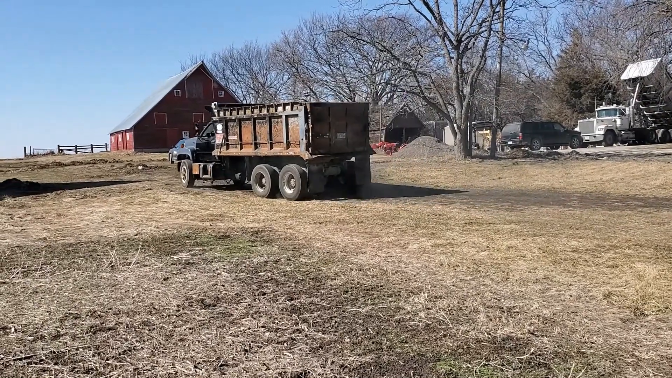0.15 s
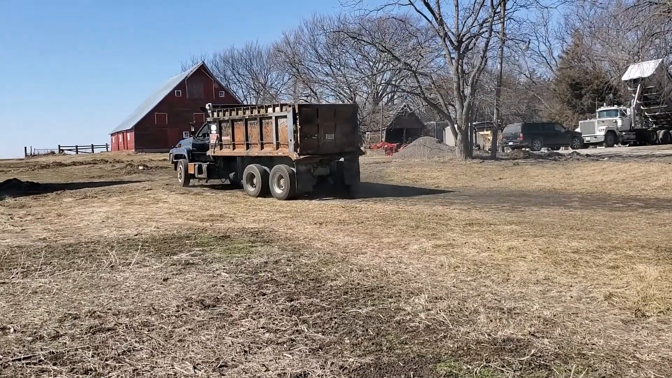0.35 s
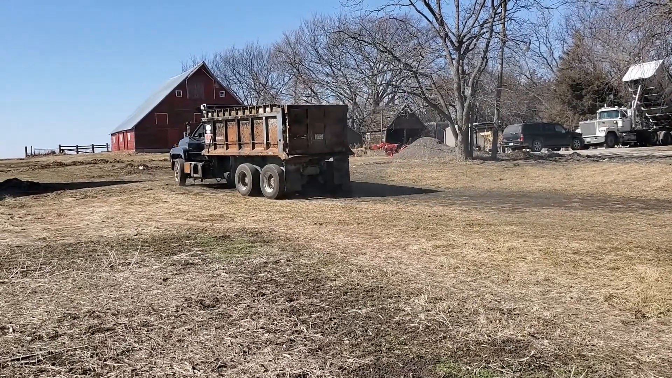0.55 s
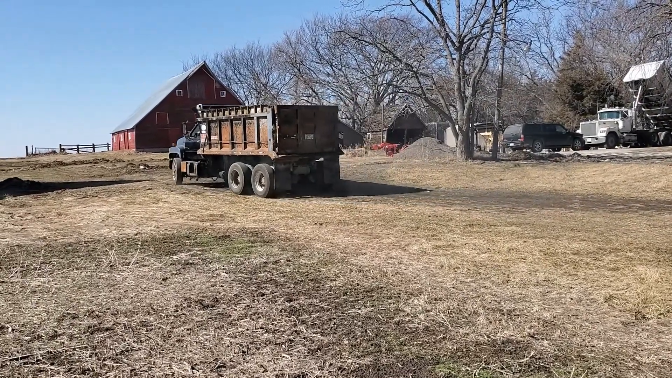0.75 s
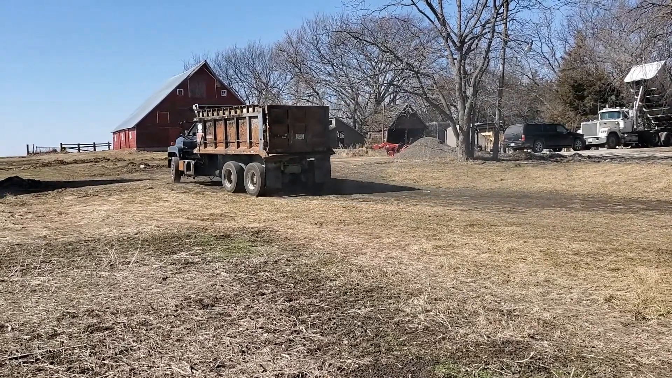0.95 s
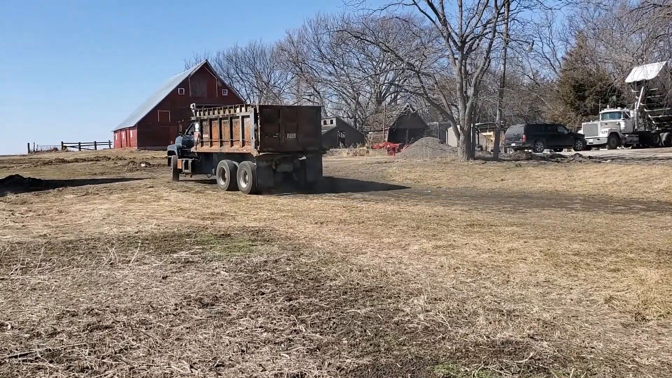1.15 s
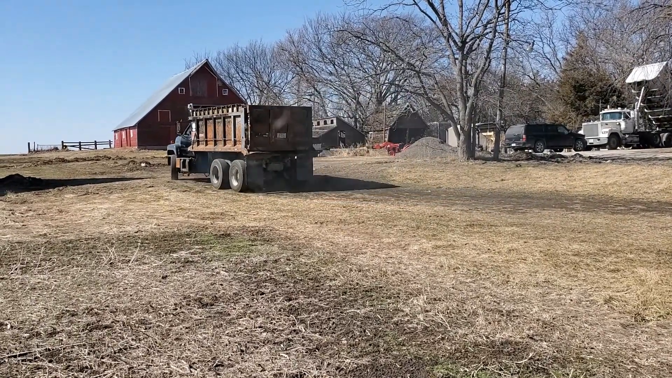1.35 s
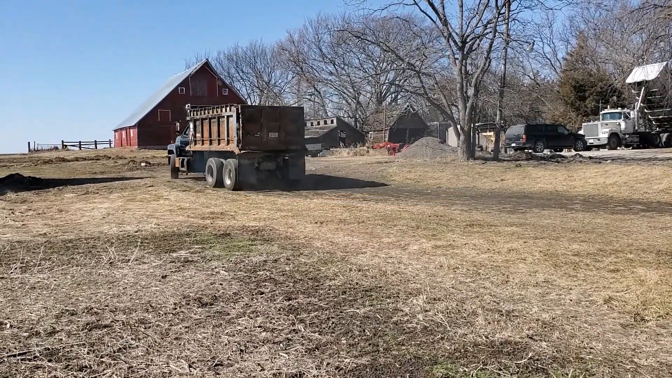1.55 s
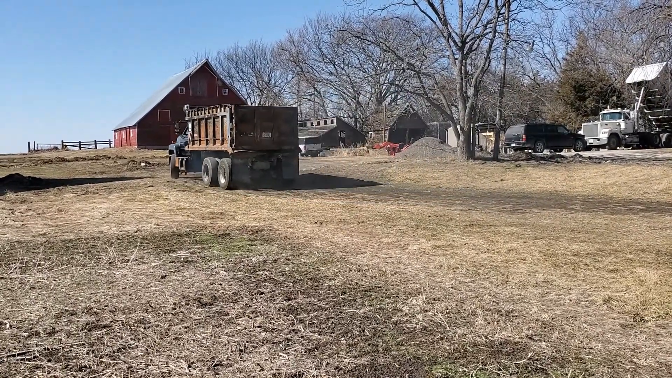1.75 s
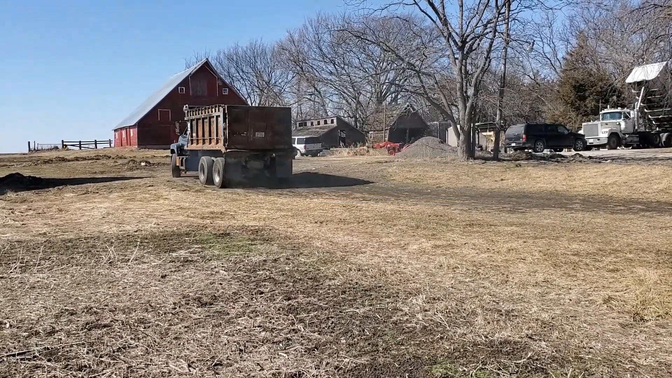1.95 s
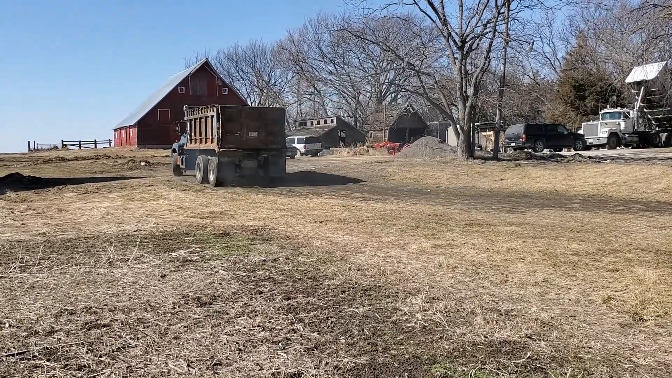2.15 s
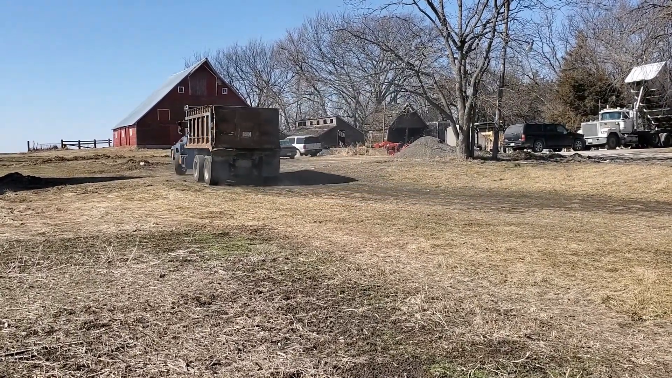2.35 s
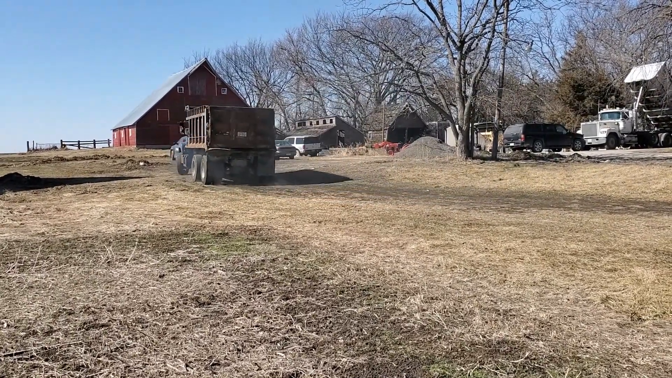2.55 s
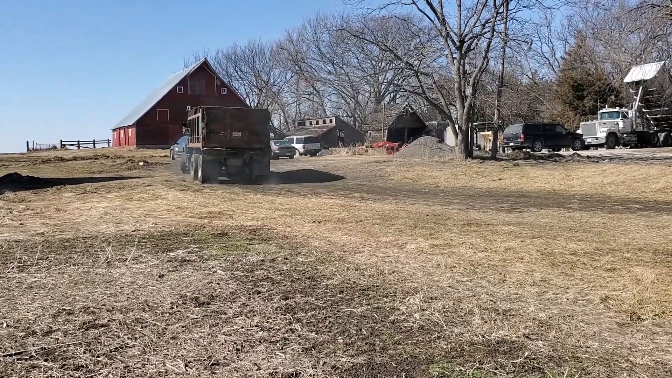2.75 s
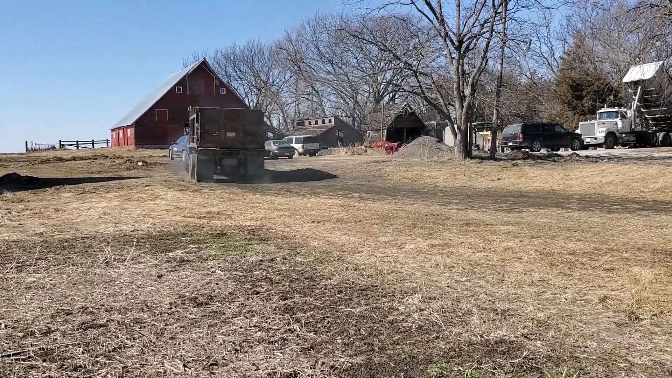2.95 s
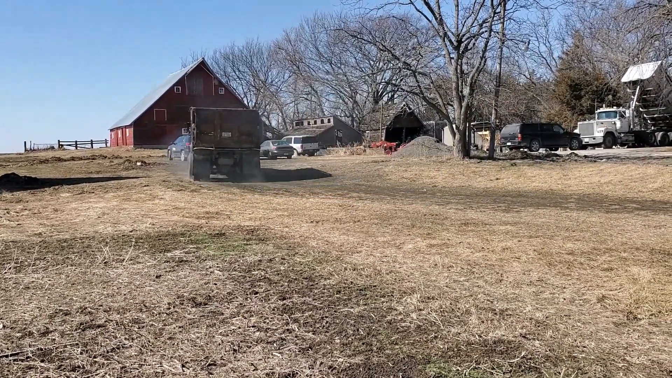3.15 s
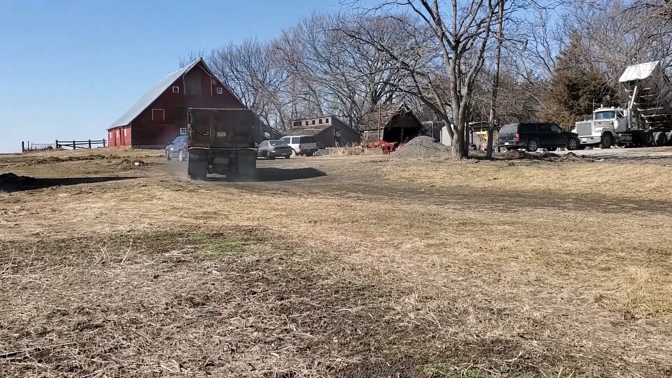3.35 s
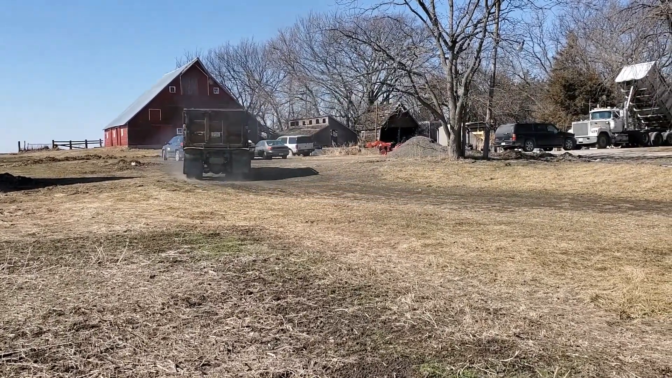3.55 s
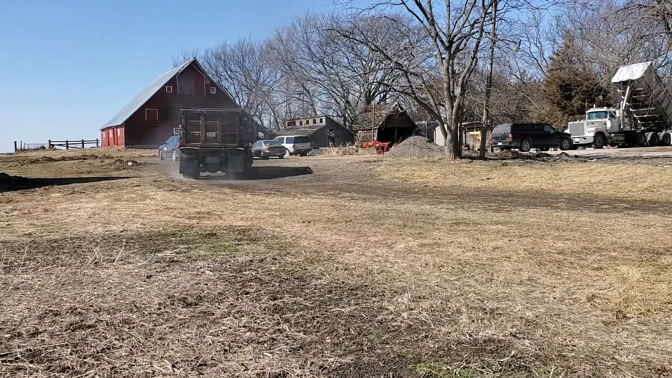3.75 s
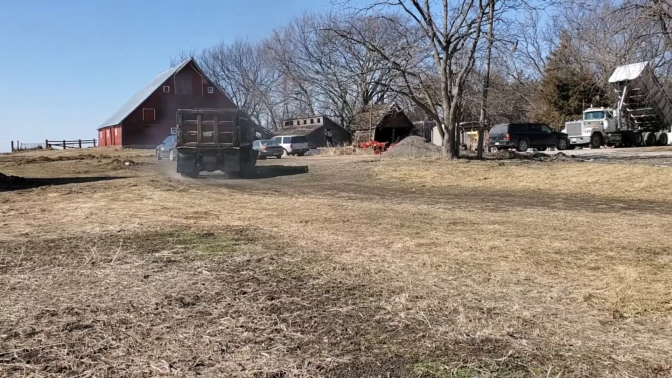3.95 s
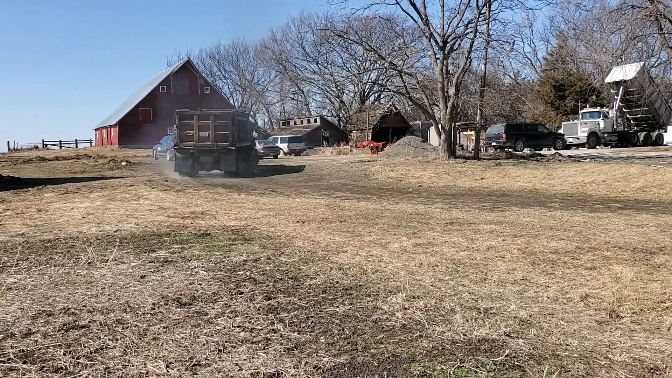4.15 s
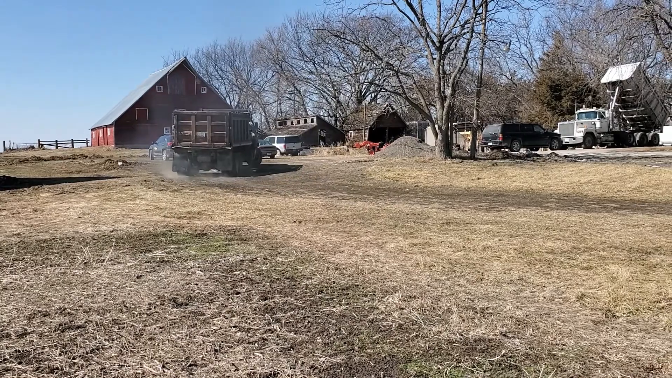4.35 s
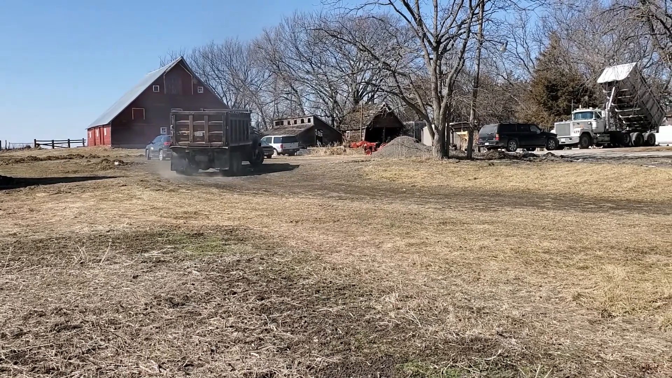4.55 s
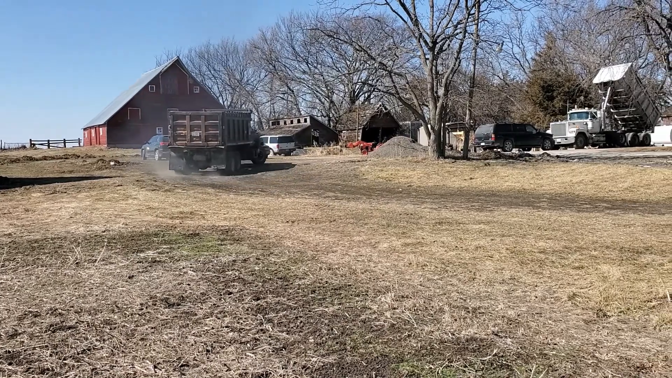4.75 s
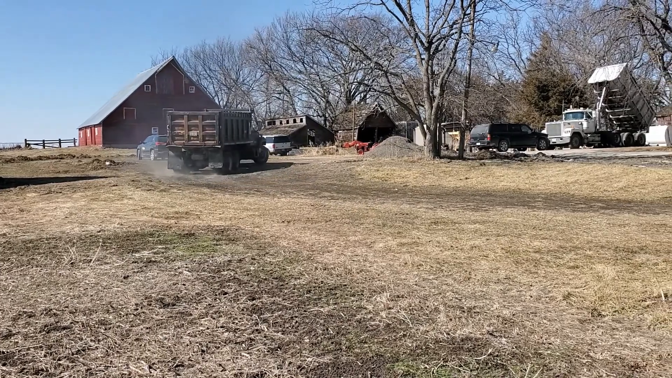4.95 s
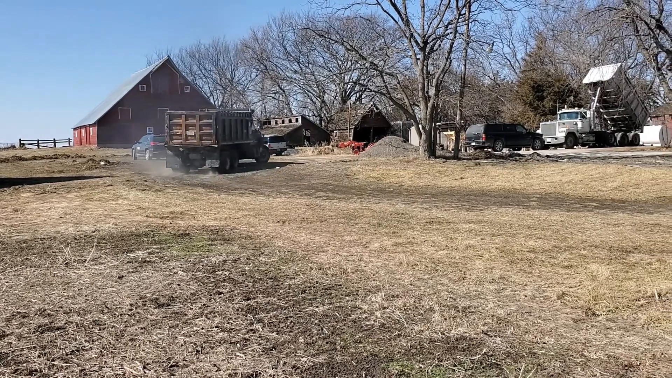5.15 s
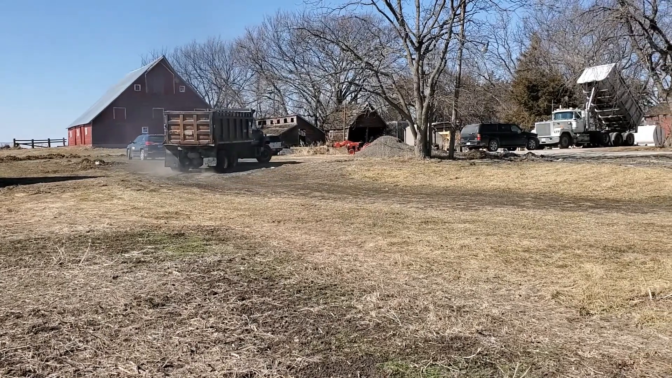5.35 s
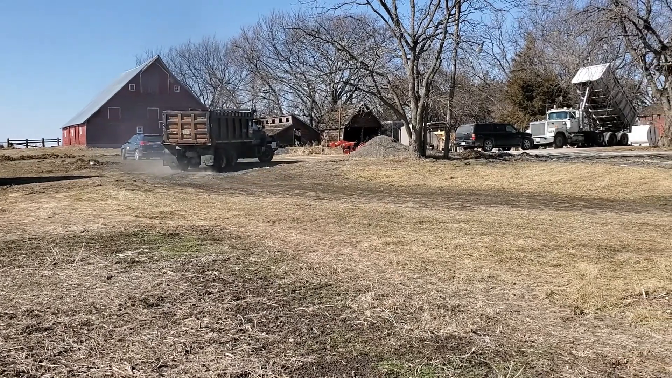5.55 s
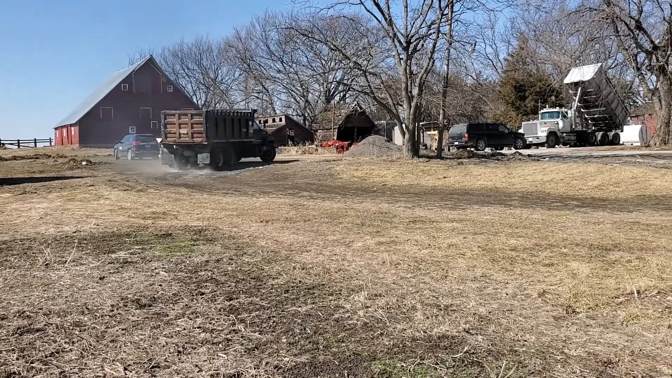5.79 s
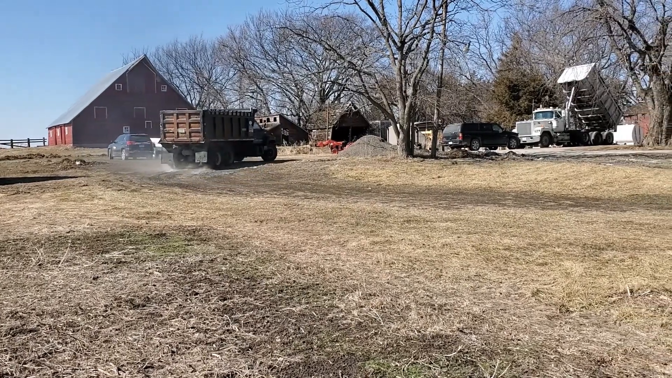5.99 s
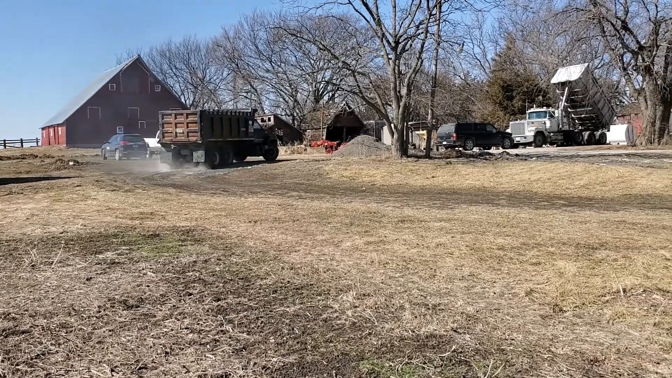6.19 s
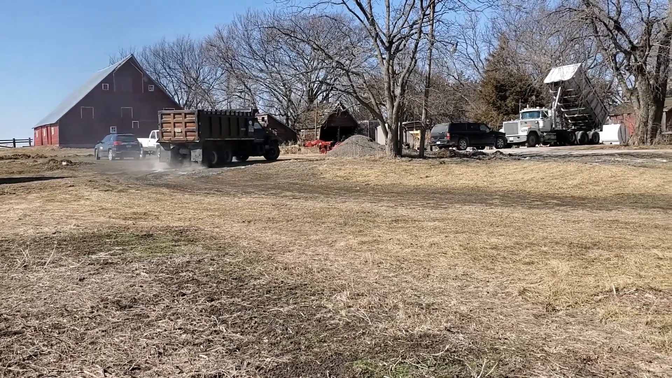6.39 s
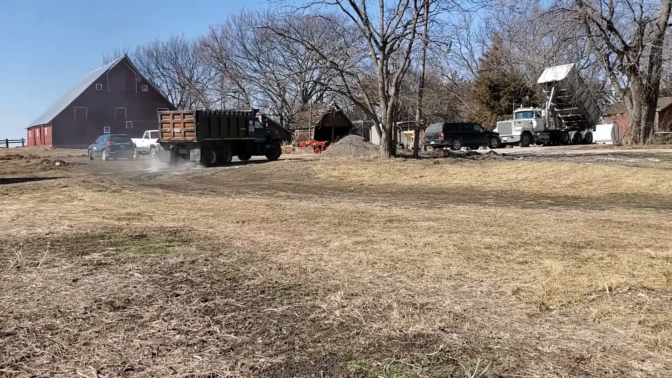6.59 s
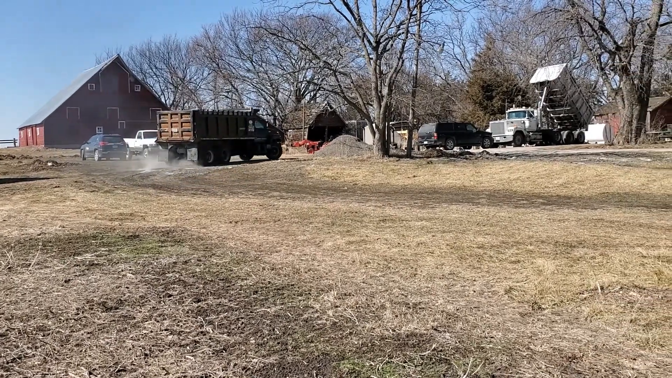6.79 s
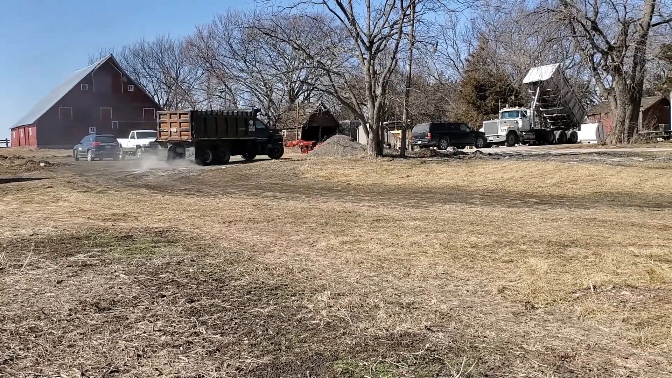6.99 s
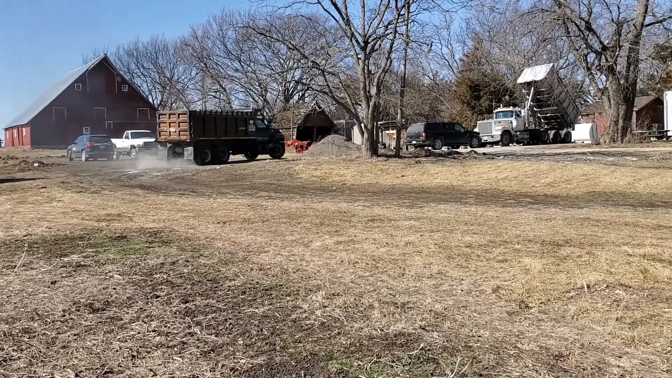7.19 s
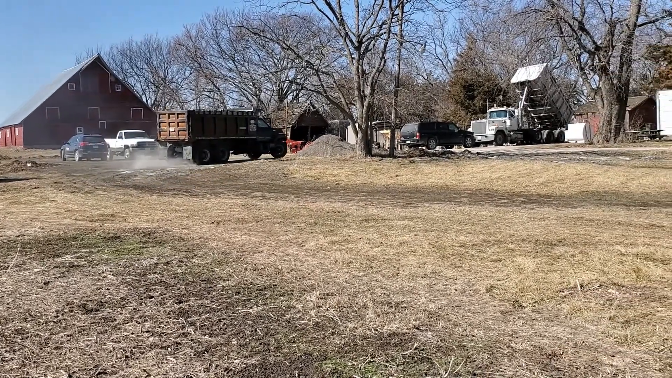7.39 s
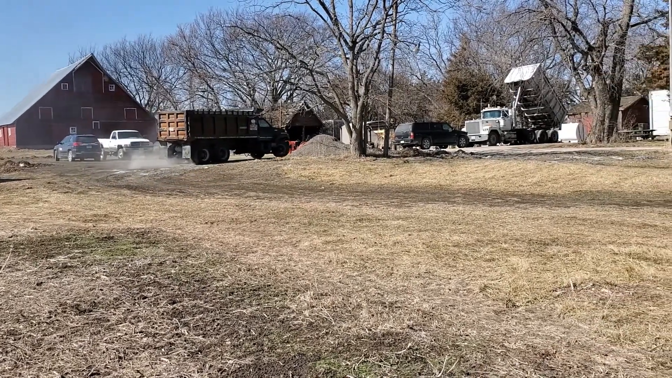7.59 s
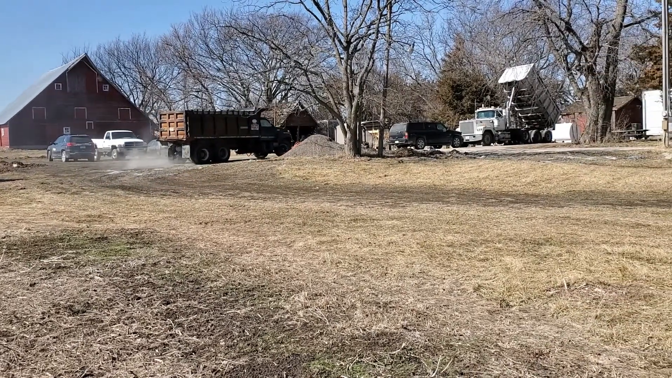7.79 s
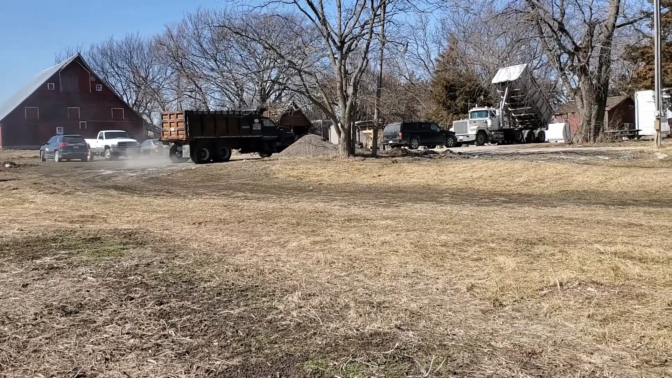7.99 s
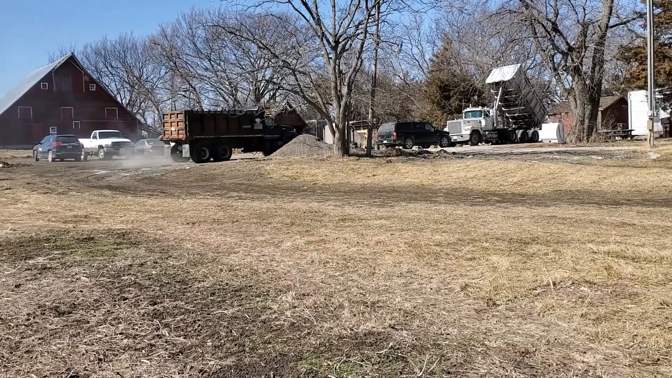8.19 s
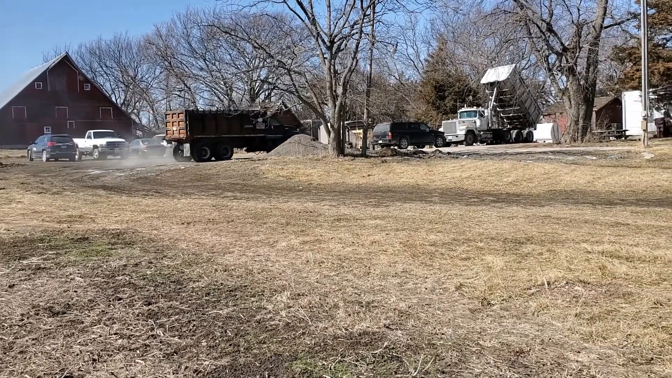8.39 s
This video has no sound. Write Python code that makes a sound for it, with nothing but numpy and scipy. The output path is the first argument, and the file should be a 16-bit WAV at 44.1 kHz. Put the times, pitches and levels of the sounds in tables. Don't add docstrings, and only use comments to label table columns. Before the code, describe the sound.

Steady deep diesel drone with knocking, hissing clatter, dulling as the truck turns away outdoors, then breaking up under low, fluttering wind gusts.

```python
import sys
import numpy as np
from scipy import signal
from scipy.fft import rfft, irfft, next_fast_len
from scipy.io import wavfile
from scipy.ndimage import uniform_filter1d

SR = 44100
rng = np.random.default_rng(int(sys.argv[2]) if len(sys.argv) > 2 else 0)


def unload_wav(signal):
    wavfile.write(
        sys.argv[1],
        SR,
        np.round(np.clip(np.atleast_2d(signal).T, -1, 1) * 32767).astype(np.int16),
    )


def rack_gain(trim_db):
    fader = np.asarray(trim_db, float)
    return 10 ** (fader / 20)


N = 371763

# t/s, f/Hz
FIRING_RATE_HZ = [(0, 79.7), (.5, 79.4), (1.35, 79.15), (1.7, 78.7), (2.1, 79.1), (2.6, 78.25), (2.9, 78.6),
                  (3.25, 78.0), (3.85, 78.9), (4.12, 78.35), (4.42, 79.4), (5.3, 78.05), (5.7, 78.25),
                  (6.45, 79.6), (6.78, 79.4), (7.05, 77.1), (7.62, 76.1), (8.43, 76.5)]
# t/s, level/dB
HUM_DB = [(0, -19), (.2, -15.5), (.95, -16), (1.35, -18), (1.65, -21.3), (2.0, -22), (2.5, -16.5),
          (2.75, -18), (3.25, -19), (3.65, -18.5), (4.3, -18.5), (4.5, -17), (4.85, -21), (5.25, -20.5),
          (6.0, -18.5), (6.9, -20), (7.35, -25), (8.43, -25)]
# t/s, half length/s, level/dB
DROPOUTS_DB = [(4.83, .04, -3), (6.3, .02, -6), (6.732, .014, -14), (7.055, .015, -6), (7.30, .035, -7),
               (7.68, .018, -9), (7.99, .015, -7), (8.165, .02, -7), (8.275, .03, -16), (8.34, .02, -12),
               (8.38, .012, -8), (8.405, .012, 5)]
# order of the four-stroke cycle, level re hum/dB
UNEVEN_ORDERS_DB = [(2, -45), (3, -37.5), (4, -21), (5, -24.5), (7, -49.5), (8, -27.5), (9, -32.5),
                    (10, -40), (14, -40), (16, -34.5), (18, -33.5)]
# f/Hz, level per Hz/dB
RUMBLE_SPECTRUM_DB = [(20, -31.5), (45, -3.5), (65, 8), (100, 8.5), (160, 6), (240, -8), (330, -35),
                      (500, -55)]
CYLINDER_KNOCK_DB = [3.5, -4.5, -1, -4.5, 0.5, 1]
# order of the cycle, start t/s, end t/s, level re knock/dB
GEAR_ORDERS_DB = [(39, -1.5, 3.1, 8), (39, 4.4, 7.3, 8), (45, -.8, 1.3, 7), (48, .2, 1.3, 4),
                  (48, 4.4, 6.6, 10), (42, 1., 2.9, 6), (42, 3.8, 5.2, 7), (51, 1.5, 3.6, 5),
                  (51, 4.9, 5.9, 7), (70, -.5, 1., 8), (70, 1.3, 2.9, 16), (70, 5., 6.4, 9),
                  (105, -.5, 2.2, 8), (100, 1.3, 2.4, 8), (76, 5., 6., 11), (81, .5, 2.3, 9),
                  (84, .2, 2., 9), (87, 7.38, 8.4, 13), (87, 7.9, 8.25, 9), (93, 4.9, 6.5, 9),
                  (100, .8, 1.6, 9), (109, .4, 1.7, 7), (124, -.5, 2.2, 8), (138, -.5, 1.8, 7)]
# f/Hz, level per Hz/dB
BAY_SPECTRUM_DB = [(300, 13), (420, 6.5), (540, 15), (780, -0.5), (1150, 7.5), (2450, 10.5), (2700, 2),
                   (3500, 2.5), (5200, -0.5), (7100, -7), (7900, -18.5), (12000, -23.5), (14000, -28.5),
                   (15500, -48)]
# f/Hz, width/Hz, level/dB
CASING_MODES_DB = [(900.4, 48, 8.5), (1390, 46, 4), (1470, 260, -4), (1930, 32, 2.5), (2085, 466, -5.5),
                   (2620, 170, -4), (3834, 420, -7.5), (3890, 48, 5.5), (4420, 760, -7.5), (6050, 1100, -5),
                   (7850, 400, -5.5), (10480, 1900, -6.5), (14700, 200, -4.5)]
# t/s, level/dB
EXPOSURE_DB = [(0, 6.5), (.3, 6), (1.1, 3.5), (1.8, 1), (2.1, -2.5), (2.5, -5), (3.2, -6), (4.1, -5.5),
               (4.5, -2), (4.8, -1), (5.6, -0.5), (6.2, 0.5), (6.55, 0), (6.8, 1), (7.4, 0.5), (7.9, 0.5),
               (8.25, -2), (8.43, 1)]
BAY_BANDS_HZ = [560, 1450, 4400, 10500]
BAY_SHARES = [0.73, 0.77, 1.22, 0.83]
BAY_TILT_DB_PER_S = [-0.1, -0.069, 0.45, -0.42]
# t/s, half length/s, level/dB
HISS_PUFFS_DB = [
    (2.599, 0.2, -5),
    (3.27, 0.12, 2.5),
    (3.96, 0.11, 0.5),
    (6.742, 0.16, 4.5),
    (6.995, 0.14, -3),
    (7.28, 0.089, 7),
]
# f/Hz, width/Hz, level/dB
LATE_COLOUR_DB = [
    (3100, 770, -8),
    (4500, 780, 2),
    (6400, 1500, -5.5),
]
# f/Hz, left-right likeness, level left re right/dB, left lead/rad
PORTS = [(300, .97, .7, .1), (700, .96, .9, 0), (1200, .82, -4.3, .5), (2200, .73, -.5, 1.8),
         (3150, .3, 7.8, 4.4), (3700, .65, -1.4, 6.8), (5500, .82, .6, 9.7), (6900, .31, 8.1, 8.7),
         (8100, .5, -.4, 9.4), (9200, .26, -1.2, 11.9), (10100, .94, .3, 12.6), (11200, .27, -.2, 11.5),
         (12200, .7, -.5, 12.5), (15000, .4, 1, 12.5)]
# t/s, level/dB, f/Hz, t60/s
CLANKS_DB = [(4.757, -29, 1280, .055), (4.768, -31, 1120, .06), (4.775, -35, 960, .07),
             (7.172, -40, 4800, .04), (7.172, -35, 1300, .1), (7.335, -46, 7000, .05),
             (7.355, -44, 6500, .05), (7.19, -43, 2250, .03), (7.362, -42, 3600, .04),
             (8.035, -60, 12000, .02), (8.036, -58, 9500, .015)]
# f/Hz, level per Hz/dB
WIND_SPECTRUM_DB = [(12, -46), (20, -18), (52, 6), (75, 2.5), (199, -12.5), (244, -15), (370, -34.5),
                    (588, -31.5), (800, -41.5), (1040, -81.5), (1760, -120)]
CALM_DB = [-42, -53]
# t/s, half length/s, level/dB, port (0 left, 1 right)
GUSTS_DB = [(1.72, .15, -37, 0), (2.0, .08, -35, 0), (2.43, .1, -32, 0), (3.1, .14, -38, 0),
            (3.6, .07, -33, 0), (4.28, .1, -37, 0), (5.35, .09, -37, 0), (5.63, .08, -31, 0),
            (6.0, .3, -36, 0), (6.53, .16, -25, 0), (6.95, .25, -29, 0), (7.57, .12, -25, 0),
            (8.13, .1, -35, 0), (8.42, .06, -31, 0), (1.7, .18, -33, 1), (2.53, .1, -32, 1),
            (3.05, .15, -28, 1), (3.3, .05, -37, 1), (7.57, .07, -22, 1), (4.5, .07, -37, 1),
            (4.72, .08, -43, 1), (5.0, .07, -41, 1), (5.7, .15, -36, 1), (6.3, .3, -23, 1),
            (6.65, .15, -22, 1), (6.9, .07, -18, 1), (7.07, .07, -21, 1), (7.42, .05, -22, 1),
            (7.88, .12, -29, 1), (8.35, .08, -33, 1)]
# t/s, level/dB, port (0 left, 1 right)
EDDIES_DB = [(3.043, -28, 1), (5.634, -25, 0), (5.958, -28, 1), (6.068, -27, 1), (6.175, -26, 1),
             (6.226, -22, 1), (6.327, -25, 1), (6.369, -24, 1), (6.409, -25, 1), (6.499, -27, 0),
             (6.572, -21, 1), (6.604, -27, 0), (6.611, -18, 1), (6.70, -22, 1), (6.744, -24, 1),
             (6.788, -23, 1), (6.903, -23, 0), (6.915, -16, 1), (6.977, -25, 1), (7.025, -26, 1),
             (7.111, -19, 1), (7.243, -27, 0), (7.397, -22, 1), (7.436, -27, 0), (7.533, -21, 1),
             (7.571, -24, 1), (7.625, -27, 1), (7.653, -26, 0), (7.894, -28, 1), (8.256, -31, 1)]


def exhaust(cycles, hum_db, second_db):
    turn = 2 * np.pi * cycles
    lines = rack_gain(hum_db + 0.32 * drift(hz=27.8)) * np.cos(6 * turn)
    lines += rack_gain(second_db + 0.6 * drift(hz=13)) * np.cos(12 * turn - 1.4)
    steady_db = uniform_filter1d(hum_db, SR)
    for k, (order, db) in enumerate(UNEVEN_ORDERS_DB):
        level = rack_gain(steady_db + db + 1.8 * drift(hz=6.6))
        lines += level * np.cos(round(order) * turn + k * k)
    near_db, share, under_hum_db = -15.5, 0.4, -19.5
    rumble_db = near_db + share * (steady_db - near_db) + under_hum_db
    rumble = rack_gain(rumble_db) * coloured(rng.standard_normal(N), RUMBLE_SPECTRUM_DB)
    return np.sqrt(2) * lines + rumble


def second_order_db(t):
    turn_s = 3.18
    db = -32 - 0.22 * np.minimum(follow(EXPOSURE_DB, t)[0], 0)
    db += -2.5 * np.maximum(t - turn_s, 0)
    return db + 1.5 * drift(hz=2.7) * np.minimum(t / turn_s, 1)


def flank_boom(t, cycles):
    start = np.clip((t - 6.9) / .3, 0, 1)
    return rack_gain(-44) * drift(hz=35) * start * np.sqrt(2) * np.cos(2 * np.pi * 17 * cycles)


def clatter(cycles, repeat, depth=.3, fall_firings=.6, turn_s=1.3):
    faces = rng.standard_normal((9, 3400))
    place = (cycles % 1 * 3400).astype(int)
    face, blend = np.divmod(np.arange(N) / SR / turn_s, 1)
    face = face.astype(int)
    same = faces[face, place] * np.cos(np.pi / 2 * blend)
    same += faces[face + 1, place] * np.sin(np.pi / 2 * blend)
    white = repeat * same + np.sqrt(1 - repeat ** 2) * rng.standard_normal(N)
    firing = 6 * cycles
    cylinder = firing.astype(int) % len(CYLINDER_KNOCK_DB)
    blow = rack_gain(CYLINDER_KNOCK_DB)[cylinder] * np.exp(-(firing % 1) / fall_firings)
    return evened(white * (1 + depth * blow))


def gears(cycles):
    out, flutter_db = np.zeros(N), 3 * drift(hz=5)
    for order, start_s, end_s, db in GEAR_ORDERS_DB:
        k = np.arange(max(round(start_s * SR), 0), round(end_s * SR))
        swell = np.sqrt(abs(np.sin(np.pi * (k / SR - start_s) / (end_s - start_s))))
        level = rack_gain(db - 31 + flutter_db[k - round(order) * 2000])
        out[k] += level * swell * np.cos(2 * np.pi * order * cycles[k])
    return out


def bay_field_db(hz, t):
    change_db = np.outer(BAY_SHARES, follow(EXPOSURE_DB, t)[0])
    change_db += np.outer(BAY_TILT_DB_PER_S, t - t.mean())
    change_db[-1] += sum(db * bump(t, s, half_s) for s, half_s, db in HISS_PUFFS_DB)
    field_db = np.array([read(list(zip(BAY_BANDS_HZ, c)), hz)[0] for c in change_db.T]).T
    late_db = sum(db * bump(hz, f, width / 2) for f, width, db in LATE_COLOUR_DB)
    field_db += np.outer(late_db, np.clip((t - 7.68) / .05, 0, 1))
    return field_db, change_db[1]


def bay(cycles, patchy_db=.9, flicker_db=0.2, shade=0.19):
    frame = dict(nperseg=512, noverlap=384)
    hz, t, direct = signal.stft(clatter(cycles, repeat=.68) + gears(cycles), SR, **frame)
    scattered = signal.stft(clatter(cycles + .3, repeat=.3), SR, **frame)[2]
    colour_db = read(BAY_SPECTRUM_DB, hz)[0]
    colour_db = colour_db + sum(db / (1 + (2 * (hz - f) / w) ** 2) for f, w, db in CASING_MODES_DB)
    field_db, knock_db = bay_field_db(hz, t)
    patches = uniform_filter1d(rng.standard_normal((len(t), len(hz))), size=30, axis=0)
    patches = evened(uniform_filter1d(patches, size=10, axis=1)).T
    flicker = evened(uniform_filter1d(rng.standard_normal(len(t)), size=6))
    same, lean_db, lead_rad = (c[:, None] for c in read(PORTS, hz))
    same = np.clip(same * (1 + shade * np.minimum(knock_db + 2, 0) * (hz > 900)[:, None]), 0, 1)
    right = same * direct * np.exp(-1j * lead_rad) + np.sqrt(1 - same ** 2) * scattered
    right = right / rack_gain(lean_db)
    shape_db = colour_db[:, None] + field_db
    shape_db = shape_db + patchy_db * (1 + hz[:, None] / 39000.0) * patches + flicker_db * flicker
    shape = rack_gain(shape_db) * (hz > 200)[:, None]
    return rack_gain(-39.0) * signal.istft(np.array([direct, right]) * shape, SR, **frame)[1][:, :N]


def clanks(t):
    out = np.zeros(N)
    for s, db, hz, t60_s in CLANKS_DB:
        level = rack_gain(db - 60 * abs(t - s) / t60_s) * np.clip((t - s) / .003, 0, 1)
        out += level * np.sin(2 * np.pi * hz * t)
    return out


def eddy(db, rise_s=.005, fall_s=.024, low_hz=60, glide_s=.011, rough=.28):
    u = np.arange(5000) / SR
    high_hz = np.interp(db, [-32, -18], [120, 330])
    hz = rng.uniform(0.74, 1.294) * (low_hz + high_hz * np.exp(-u / glide_s))
    lowpass = signal.butter(3, 380, fs=SR, output="sos")
    swirl = evened(signal.sosfiltfilt(lowpass, rng.standard_normal(len(u)), padtype=None))
    swing = np.sqrt(2) * np.sin(2 * np.pi * (np.cumsum(hz) / SR + rng.random())) + rough * swirl
    envelope = (1 - np.exp(-u / rise_s)) ** 2 * np.exp(-u / fall_s) * np.cos(np.pi / 2 * u / u[-1])
    return rack_gain(db + 7.0) * swing * envelope


def wind(t, lumpy_db=2.):
    power = rack_gain(CALM_DB)[:, None] ** 2 * np.ones(N)
    for s, half_s, db, port in GUSTS_DB:
        power[round(port)] += (rack_gain(db) * bump(t, s, half_s)) ** 2
    lumps = [rack_gain(lumpy_db * drift(hz=11)) * coloured(rng.standard_normal(N), WIND_SPECTRUM_DB) for _ in power]
    out = np.sqrt(power) * np.array(lumps)
    for s, db, port in EDDIES_DB:
        swing, at = eddy(db), round((s - .012) * SR)
        part = out[round(port), at:at + len(swing)]
        part += swing[:len(part)]
    return out


def evened(x):
    return x / np.sqrt(np.mean(x ** 2) + 1e-20)


def read(points, hz):
    f, *columns = np.transpose(points)
    return [np.interp(np.log(hz + 1), np.log(f + 1), c) for c in columns]


def follow(rows, t):
    s, *columns = np.transpose(rows)
    return [np.interp(t, s, c) for c in columns]


def coloured(x, points):
    size = next_fast_len(N)
    gain = rack_gain(read(points, np.fft.rfftfreq(size, 1 / SR))[0])
    return evened(irfft(rfft(x, size) * gain, size)[:N])


def drift(hz):
    size = N // 100 + 2
    lowpass = 1 / (1 + (np.fft.rfftfreq(size, 100 / SR) / hz) ** 4)
    slow = irfft(rfft(rng.standard_normal(size)) * lowpass, size)
    return evened(np.interp(np.arange(N) / 100, np.arange(size), slow))


def bump(t, s, half):
    return np.exp(-((t - s) / half) ** 2)


def scene():
    t = np.arange(N) / SR
    hum_db = follow(HUM_DB, t)[0]
    hum_db += .8 * np.maximum(t - 6.0, 0) * drift(hz=21)
    firing_hz = uniform_filter1d(follow(FIRING_RATE_HZ, t)[0], size=9000)
    cycles = np.cumsum(firing_hz * (1 + .0006 * drift(hz=4))) / SR / 6
    lull = rack_gain(sum(db * bump(t, s, half_s) for s, half_s, db in DROPOUTS_DB))
    pipe = exhaust(cycles, hum_db, second_order_db(t)) * lull
    pipe = pipe + flank_boom(t, cycles) + clanks(t)
    late = np.r_[np.zeros(3), pipe[:-3]]
    return np.array([late * rack_gain(0.29), pipe]) + bay(cycles) + wind(t) * lull


def roll_off(x):
    return signal.sosfilt(signal.butter(12, 15620, fs=SR, output="sos"), x)


def record(dry):
    hiss = rack_gain(-100) * rng.standard_normal((N, 2)).T
    return roll_off(dry + hiss)


dry = scene()
out = record(dry)
unload_wav(out)
```